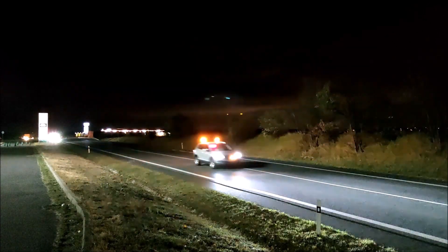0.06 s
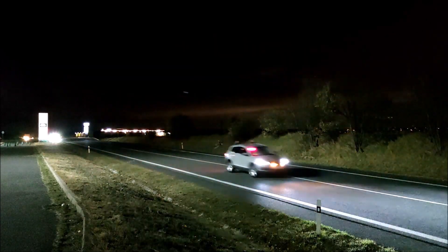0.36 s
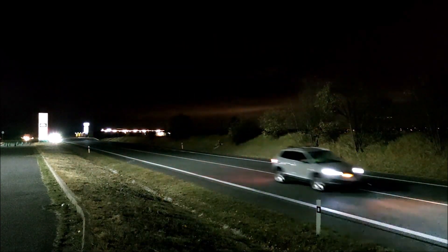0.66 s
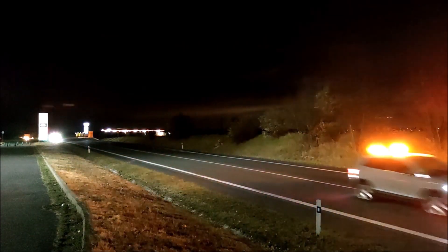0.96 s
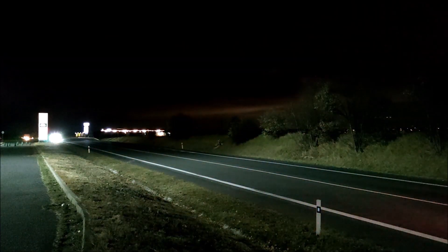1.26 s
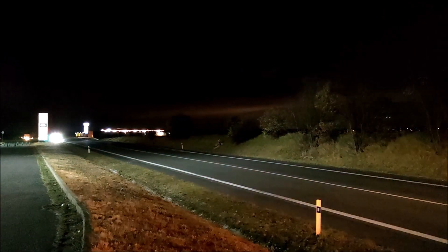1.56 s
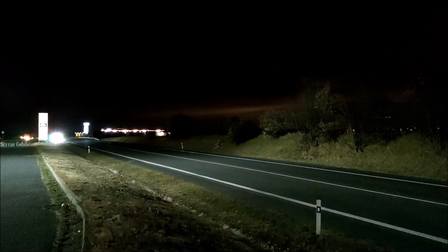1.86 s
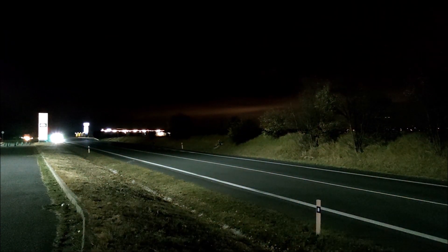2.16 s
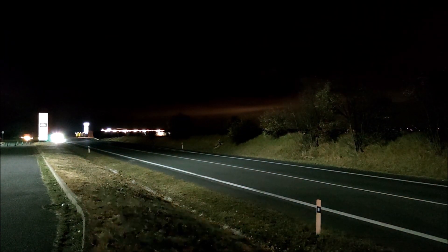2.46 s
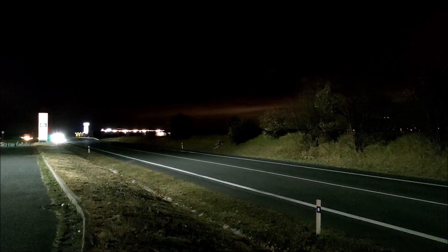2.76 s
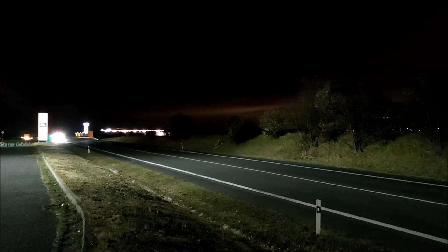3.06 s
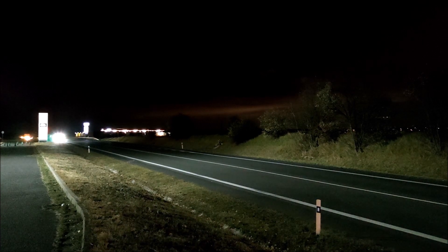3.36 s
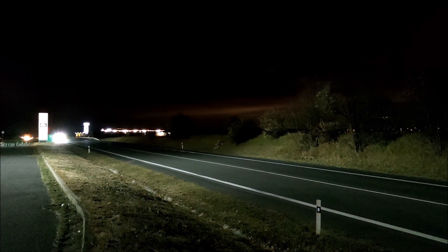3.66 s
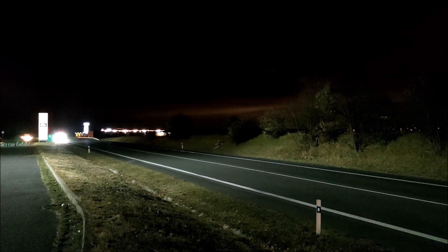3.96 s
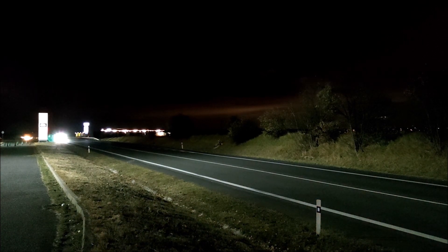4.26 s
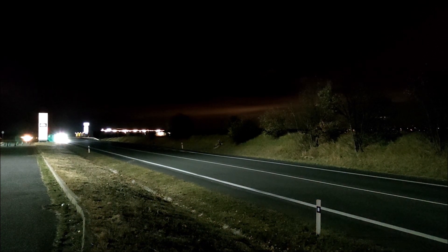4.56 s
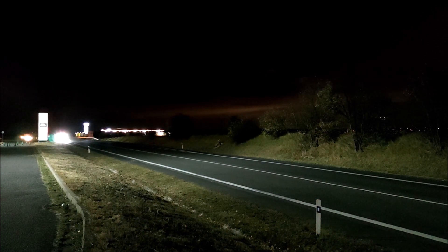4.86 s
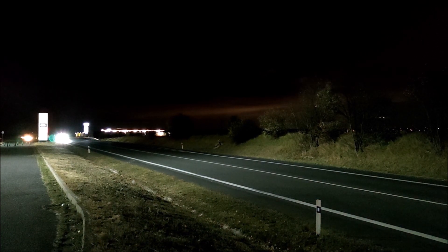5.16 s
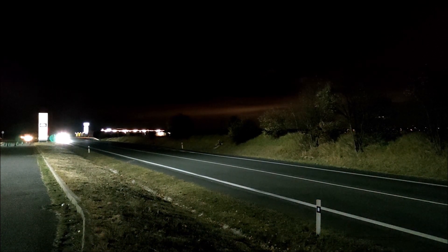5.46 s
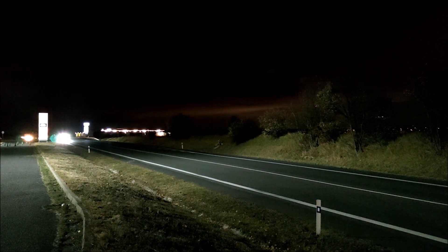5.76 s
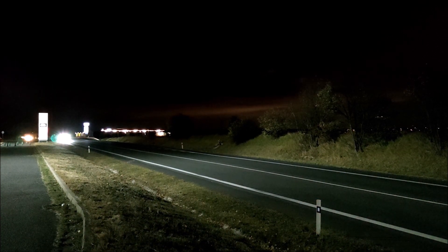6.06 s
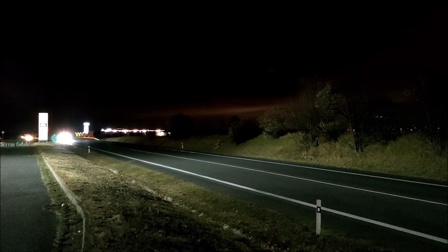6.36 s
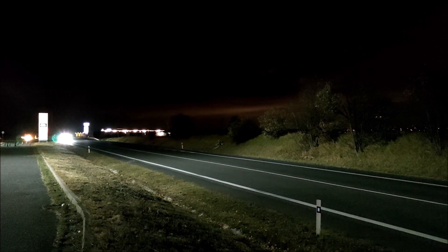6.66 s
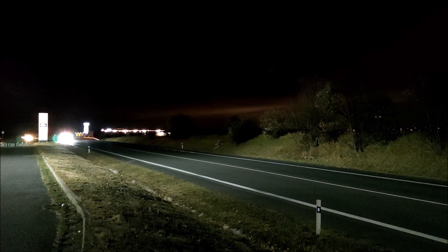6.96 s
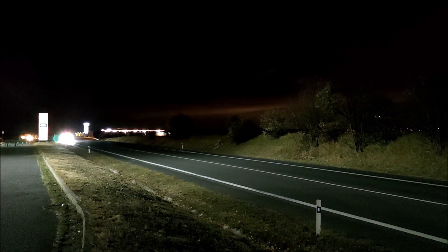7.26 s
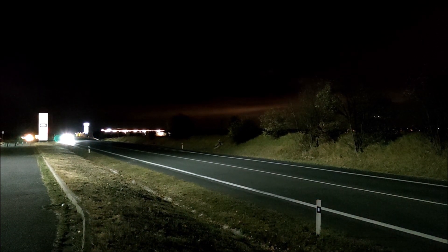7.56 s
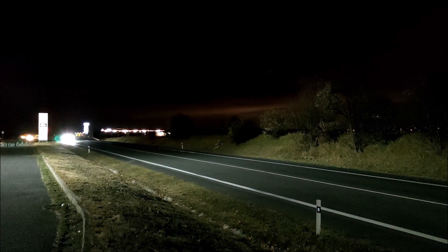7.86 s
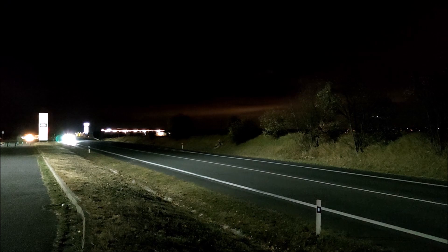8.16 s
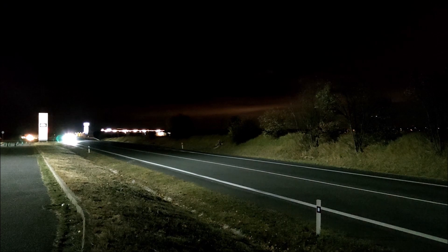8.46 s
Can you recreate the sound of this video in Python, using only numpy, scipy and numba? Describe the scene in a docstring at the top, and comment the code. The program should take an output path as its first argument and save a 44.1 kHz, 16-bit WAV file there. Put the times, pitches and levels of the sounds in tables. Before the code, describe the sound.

A car approaches at a steady speed on a country road at night, heard from a phone at the roadside. Its tyres roar and hiss over a soft engine hum, passing closest on the right at about 1.8 seconds with a slight drop in pitch. It then rolls away behind the microphone, leaving a distant tyre roar that lingers until about 8 seconds.

Light wind touches the microphone from the start. From about 2.5 seconds, strong gusts become the loudest sound, with low, uneven rumbling and sharp pops that jump between left and right. They are heaviest until about 5.5 seconds, then turn patchier, ease around 7.5 and swell again near 8. A few very faint dry rustles come close by from 4 seconds onward. Far traffic murmurs quietly underneath, and at about 8.4 seconds something taps lightly on the phone.

```python
"""A country road at night, heard by a phone with two microphone openings (ports), left and right.
A car passes at a steady speed and rolls away behind the phone. Its engine hums, its tyres roar and hiss
and pump air from their grooves, and the sound reaches one port before the other. Then gusts of wind
buffet each port separately and stir a few dry rustles nearby. Far traffic murmurs underneath,
and at the end something taps lightly on the phone."""
import sys
import numpy as np
from scipy import signal
from scipy.fft import rfft, irfft, next_fast_len
from scipy.io import wavfile
from scipy.ndimage import uniform_filter1d, minimum_filter1d, map_coordinates
from numba import njit

SR = 44100
rng = np.random.default_rng(int(sys.argv[2]) if len(sys.argv) > 2 else 0)


def output_pcm(signal):
    """Save a mono or channel-first signal as 16-bit PCM at the path in sys.argv[1].

    Samples are clipped to [-1, 1] before scaling.
    """
    pcm = np.clip(np.atleast_2d(signal).T, -1, 1) * 32767
    wavfile.write(sys.argv[1], SR, np.round(pcm).astype(np.int16))


N = 375291
TIME = np.arange(N) / SR
CLOSEST_S, PASSING_S = 1.755, .57  # when the car is closest; time it takes to drive that closest distance
ALONG = (TIME - CLOSEST_S) / PASSING_S  # its place on the road, counted in closest distances
NEAR = 1 / (1 + ALONG ** 2)  # 1 when closest, towards 0 far away
PAST = .5 + .5 * ALONG * np.sqrt(NEAR)  # goes from 0 (coming) to 1 (leaving)

# The tone colour of each noise. Each row: frequency in Hz, relative level in dB.
NIGHT_COLOUR = [(100, -13.5), (450, 2.5), (780, -10.5), (1100, -2.5), (2000, -9), (4000, -28.5),
                (7700, -25.5), (8800, -35), (14300, -33.5)]
RUSTLE_COLOUR = [(1200, -19), (2800, 1), (3400, -1), (4000, 3), (5000, -0.5), (7500, -4), (9000, -13),
                 (14000, -21.5)]
LEFT_WIND_COLOUR = [(8, -15), (20, 4.5), (60, 3), (130, -0.5), (250, -4), (450, -4), (800, -5.5),
                    (1500, -1.5), (4000, -23.5)]
RIGHT_WIND_COLOUR = [(14, -17.5), (30, -8.5), (60, 2.5), (130, 2), (250, 1.5), (450, 1.5), (800, 0),
                     (1500, -4), (4000, -7.5)]
TREAD_COLOUR = [(150, -15.5), (400, -16.5), (600, -6), (800, -1.5), (1000, -1.5), (1400, -8), (2000, -17.5),
                (4000, -51)]
SIDEWALL_COLOUR = [(100, -4.5), (250, -3.5), (400, -6.5), (600, -2), (780, -3.5), (1000, -26),
                   (1600, -44.5)]
HISS_COLOUR = [(250, -0.5), (500, -2.5), (1200, 13), (2500, 6.5), (4000, 3), (5500, -0.5), (7700, 1),
               (8700, -13), (10200, -14), (11500, -21), (14300, -19)]
GROOVES_COMING = [(900, -24.5), (1300, 0), (1650, 5), (2150, 2), (2550, -0.5), (3050, -4), (3500, -10),
                  (4200, -14.5), (6000, -18.5), (7700, -34.5), (9000, -54)]
GROOVES_LEAVING = [(900, -22), (1400, 5.5), (1800, 10), (2400, 2), (2950, 0.5), (3500, -6), (4200, -11),
                   (6000, -21), (7700, -42), (9000, -54)]
# Spells of far tyre whine. Each row: middle in seconds, half length in seconds, level in dB.
WHINE_SPELLS = [(5.68, .08, -70), (6.2, .12, -67), (6.72, 0.12, -75)]
# Dry rustles. Each row: middle in seconds, half length in seconds, level in dB, left minus right in dB.
DRY_RUSTLES = [(4.105, 0.026, -54.5, -6), (4.503, 0.013, -53, -3), (4.582, .03, -59, -5),
               (5.754, 0.025, -58, -4), (5.95, 0.014, -68, -5), (6.851, .012, -62, 4),
               (7.094, .06, -64, -3), (8.37, 0.018, -58, -7), (8.427, 0.022, -64, -6)]
# Taps on the phone. Each row: time in seconds, strength in dB.
PHONE_TAPS = [(8.355, -55), (8.399, -45), (8.424, -52)]
# Ringing notes of its case. Each row: pitch in Hz, width in Hz, level in dB, gain at the right port.
CASE_NOTES = [(3400, 200, 0, -.7), (3930, 300, -5.5, 1)]
# The breeze between gusts. Each row: time in seconds, left level in dB, right level in dB.
BREEZE_LEVELS = [(0.0, -38, -42.5), (1.7, -34, -36.5), (2.45, -30.5, -34.5), (3.1, -22.5, -25.5),
                 (4.05, -26, -36.5), (4.7, -25.5, -27.5), (5.3, -24.5, -45), (6.05, -34, -43),
                 (6.75, -30, -49), (7.55, -43, -41), (8.5, -31, -26)]
# Gusts. Each row: time of full strength in seconds, hold in seconds, left level in dB, right level in dB.
WIND_GUSTS = [(0.87, 0.038, -29, -27), (1.276, 0.073, -31.5, -54.0), (1.619, 0.042, -27, -37),
              (1.871, 0.069, -28.0, -25.5), (2.046, 0.012, -26, -25), (2.562, 0.035, -49.0, -19),
              (2.632, .008, -27, -12), (2.65, 0.061, -16.5, -36), (2.713, .006, -31, -21),
              (2.78, 0.1, -16, -13.5), (2.849, 0.14, -15.5, -20), (3.026, 0.043, -15, -24),
              (3.083, 0.11, -15, -31), (3.21, 0.097, -21, -22), (3.319, 0.074, -21.5, -29),
              (3.497, 0.052, -25, -24.5), (3.705, 0.082, -14.5, -16.5), (3.792, 0.056, -24.5, -12),
              (3.868, 0.024, -21.5, -23.5), (4.161, 0.04, -16.5, -48.5), (4.228, 0.074, -11.5, -16),
              (4.325, 0.1, -24, -22), (4.514, 0.059, -43, -19), (4.6, 0.12, -22, -23),
              (4.755, 0.015, -15.5, -11.5), (4.848, 0.049, -17.5, -25), (4.932, 0.014, -24, -14.5),
              (4.997, 0.014, -16.5, -17.5), (5.066, 0.027, -22, -14.5), (5.109, 0.081, -15, -15.5),
              (5.249, 0.013, -26, -13.5), (5.272, 0.023, -13.5, -25), (5.363, 0.015, -39, -24),
              (5.443, 0.013, -19, -18), (5.481, 0.073, -23, -27), (5.626, 0.0066, -39, -21.5),
              (5.68, 0.054, -25.5, -19.5), (5.793, 0.02, -40, -24.5), (5.881, 0.029, -41, -28),
              (5.955, 0.0036, -21, -29), (6.14, 0.04, -25, -47), (6.305, 0.032, -24, -51),
              (6.388, 0.059, -16.5, -33), (6.481, 0.031, -27, -17.5), (6.583, 0.05, -24.5, -31.5),
              (6.7, 0.016, -28, -24), (6.85, 0.085, -31.5, -24.5), (6.945, 0.027, -25.5, -32),
              (7.017, 0.0042, -33, -26.5), (7.189, 0.0066, -21, -60.0), (7.37, 0.04, -38, -64),
              (7.703, 0.028, -44, -25), (7.791, 0.14, -49.5, -21.5), (7.972, 0.09, -30, -28.5),
              (8.146, 0.067, -20.5, -31), (8.241, 0.081, -17, -35), (8.307, 0.065, -19.5, -19.5)]
# Hard eddies (small whirls of air).
# Each row: time in seconds, port (0 left, 1 right), peak in dB, half length in seconds.
HARD_EDDIES = [(1.925, 1, -9, 0.0031), (2.549, 1, -5, 0.00075), (2.645, 0, 1, 0.0009),
               (2.793, 1, 1, 0.00085), (2.834, 1, -1, 0.0011), (2.855, 1, -2.5, 0.0007),
               (2.974, 1, -5, 0.0011), (3.037, 0, -8, .001), (3.056, 1, -5, 0.00081),
               (3.099, 0, -9, 0.0015), (3.382, 1, -6, 0.001), (3.794, 1, -6, 0.00082),
               (4.025, 0, -14.5, .0016), (4.163, 0, -14, .0016), (4.19, 0, -12.5, 0.00044),
               (4.256, 0, -2, 0.00061), (4.555, 1, -19, 0.00053), (4.565, 1, -12.5, 0.00068),
               (4.646, 1, -14, 0.0008), (4.764, 1, 6.5, 0.00096), (4.775, 1, 0.5, 0.00076),
               (4.79, 1, -3, 0.00077), (4.867, 0, -11, 0.001), (4.934, 1, -5, 0.0028),
               (4.987, 1, -13, 0.00082), (5.062, 1, -3, 0.0024), (5.125, 1, -2.5, 0.00066),
               (5.26, 1, -4, 0.00081), (5.287, 0, -3, 0.0027), (5.292, 0, -4.5, 0.00047),
               (5.449, 1, -4.5, 0.0013), (6.317, 0, -10.5, 0.002), (6.352, 0, -12, 0.0022),
               (6.383, 0, -9.5, 0.00069), (6.437, 0, -7, 0.0012), (6.503, 1, -9.5, 0.00084),
               (6.725, 0, -9.5, 0.0012), (6.964, 0, -14, 0.0027), (7.128, 0, -18, 0.0018),
               (7.189, 0, -14, 0.0015), (7.836, 1, -12, 0.00078), (7.935, 1, -9.5, .0011)]
# Swells and dips of the tyre noise.
# Each row: middle in seconds, half length in seconds, then the change in dB of roar, grooves and hiss.
TYRE_SWELLS = [(0.297, 0.053, 2, 2.5, -3), (0.435, 0.09, 2.5, 4, 2.5), (0.798, 0.11, -0.2, 0.8, 3.5),
               (1.18, 0.11, 0.4, -0.5, 0.5), (1.43, 0.25, 1, 1, 0.5), (2.03, 0.056, 1, 2.5, 0),
               (2.853, 0.1, -0.5, 3.5, -0.5), (3.52, 0.085, 3.5, 2, 2.5), (3.98, 0.039, 1, -16, 0.5),
               (4.4, 0.047, -1, 9, -2.5), (4.44, 0.2, 5.5, 3, 4), (5.012, 0.055, -1, -8, -0.5),
               (6.15, 0.44, 3, 3, 0), (6.698, 0.1, -1.5, -1, -2), (7.1, 0.16, 5.5, -1, 1),
               (7.597, 0.31, 4.5, -8, 1.5)]
# The wandering pitch of the far roar. Each row: time in seconds, pitch in Hz.
FAR_ROAR_PITCH = [(.4, 1171), (1.3, 1058), (4.3, 1141), (6.35, 1060), (6.95, 1259), (7.7, 1299)]
# Bands of the far roar that come and go. Each row: middle pitch in Hz, relative level in dB.
FAR_ROAR_BANDS = [(860, -6.5), (1060, -3.5), (1270, -5.5), (1520, -9.5)]
# Sound bending round the phone colours the left port as the car moves.
# Each row: time in seconds, treble lift in dB, pitch of a peak or dip in Hz, its height in dB.
LEFT_PORT_TONE = [(.2, -0.5, 2700, 2.5), (.8, -2, 2480, 5.5), (1.25, 2, 2050, 4), (1.8, 1.5, 2900, -1.5),
                  (2.2, 1, 3300, 5.5), (2.52, 0.5, 3630, 6), (2.67, -0.5, 3750, 3), (2.85, 0, 3730, 1),
                  (3.7, 1, 3400, 4), (4.4, 0.5, 3400, -4.5), (8.5, -0.5, 3400, 5)]
# At the right port a bright spot slides down as the car draws level.
# Each row: time in seconds, pitch of the spot in Hz, its height in dB.
RIGHT_PORT_TONE = [(1.05, 4870, -1), (1.36, 3700, 6), (1.55, 2500, -0.5), (1.8, 1904, 0)]


def undb(db):
    """Turn decibels into a gain."""
    return 10 ** (np.asarray(db) / 20)


def unit(x):
    """Scale a signal to an average (rms) level of 1."""
    return x / np.sqrt(np.mean(x ** 2))


def bell(middle_s, half_s):
    """A smooth rise to 1 and fall again."""
    return np.exp(-.5 * ((TIME - middle_s) / half_s) ** 2)


def curves(table):
    """Join the rows of a timed table with straight lines, one curve for each column after the time."""
    times, *columns = np.transpose(table)
    return [np.interp(TIME, times, column) for column in columns]


def noise(colour):
    """Noise of level 1 with the given tone colour, falling away beyond the ends of the table."""
    size = next_fast_len(N)
    freqs = np.arange(size // 2 + 1) * SR / size + 1
    hz, db = np.transpose(colour)
    gain = undb(np.interp(np.log(freqs), np.log(hz), db))
    gain = gain * np.minimum(freqs / hz[0], 1) * np.minimum(hz[-1] / freqs, 1) ** 2
    return unit(irfft(rfft(rng.standard_normal(size)) * gain, size)[:N])


def wobble(per_s):
    """A smooth random wobble of size 1 that heads for a new value per_s times a second."""
    hold = max(int(SR / per_s), 2)
    steps = np.repeat(rng.standard_normal(N // hold + 1), hold)
    return unit(uniform_filter1d(uniform_filter1d(steps, hold), hold)[:N])


@njit
def lowpass(x, hz, damping):
    """Keep what lies below a moving frequency; low damping makes the filter ring."""
    out, band_state, low_state = np.empty(len(x)), 0., 0.
    for i in range(len(x)):
        step = np.tan(np.pi * hz[i] / SR)
        band = (band_state + step * (x[i] - low_state)) / (1 + step * (step + damping))
        out[i] = low_state + step * band
        band_state, low_state = 2 * band - band_state, 2 * out[i] - low_state
    return out


def bandpass(x, hz, width_hz):
    """Keep a band around a pitch that may move."""
    hz = np.clip(hz, 50, .4 * SR) + np.zeros(N)
    damping = float(width_hz / hz.mean())
    return np.gradient(lowpass(x, hz, damping)) * damping * SR / (2 * np.pi * hz)


def car_bearing(late_s=0., closest_deg=69.5, bend_deg_per_s=1.05):
    """The car's direction on a gently bending road, in radians: 0 is ahead of the phone, pi behind."""
    since_s = TIME - late_s - CLOSEST_S
    return np.radians(closest_deg - bend_deg_per_s * since_s) + np.arctan(since_s / PASSING_S)


def at_ports(x, bearing, detour=0., side_lag_s=.00052):
    """Sound from the side reaches the right port later; a detour round the phone adds to the delay."""
    lag_s = side_lag_s * np.sin(bearing) * (1 + detour * np.maximum(np.cos(bearing), 0) ** 2)
    return np.array([x, map_coordinates(x, [np.arange(N) - lag_s * SR], order=3, mode="nearest")])


def night_air(level_db=-53):
    """Far traffic and night air, from no one direction."""
    return np.array([noise(NIGHT_COLOUR) * undb(level_db + 1.1 * wobble(3.8)) for _ in range(2)])


def far_whine(hz=2935, width_hz=70, waver_db=3.5):
    """Far down the road the tyres sing faintly on one note that comes and goes."""
    swell = sum(undb(db) * bell(s, half_s) for s, half_s, db in WHINE_SPELLS)
    note = unit(bandpass(rng.standard_normal(N), hz * (1 + .008 * wobble(5)), width_hz))
    return at_ports(note * swell * undb(waver_db * wobble(12)), car_bearing())


def rustles(grain_db=4.5, grains_per_s=450):
    """Short, grainy brushes of something dry close by."""
    sides = np.array([[.5], [-.5]])
    swell = sum(undb(db + sides * pan_db) * bell(s, half_s) for s, half_s, db, pan_db in DRY_RUSTLES)
    grain = undb(grain_db * wobble(grains_per_s))
    return swell * np.array([unit(noise(RUSTLE_COLOUR) * grain) for _ in range(2)])


def taps(attack_s=.0008, decay_s=.0041, scratch_db=-7):
    """Each tap is a short scratch that rings the phone's case, driving the ports in or out of step."""
    push = np.zeros(N)
    for s, db in PHONE_TAPS:
        rise = np.clip(1 + (TIME - s) / attack_s, 0, 1)
        push += undb(db) * rise * np.exp(-np.maximum(TIME - s, 0) / decay_s)
    out = np.array([noise(RUSTLE_COLOUR) for _ in range(2)]) * push * undb(scratch_db)
    for hz, width_hz, db, right_gain in CASE_NOTES:
        ring = bandpass(rng.standard_normal(N) * push, hz, width_hz) * np.sqrt(SR / (np.pi * width_hz))
        out += np.array([[1], [right_gain]]) * ring * undb(db)
    return out


def eddies():
    """A hard eddy crosses one port: a spike of pressure between two shallow troughs."""
    out = np.zeros((2, N))
    for s, port, db, half_s in HARD_EDDIES:
        offset = (TIME - s) / half_s
        spike = (1 - offset ** 2) / (1 + offset ** 2 / 2) ** 3
        out[round(port)] += undb(db) * rng.choice([-1, 1]) * spike
    return out


def wind_strength(port, attack_s=.036, release_s=.024, wake_db=-12, wake_s=.0048, waver_db=2.0):
    """Wind level in dB on one port: breeze, gusts and the wake of rough air that each eddy drags."""
    power = undb(curves(BREEZE_LEVELS)[port]) ** 2
    for s, hold_s, *port_db in WIND_GUSTS:
        rise = np.clip(1 + (TIME - s) / attack_s, 0, 1)
        fall = np.exp(-np.clip((TIME - s - hold_s) / release_s, 0, 20))
        power += (undb(port_db[port]) * rise * fall) ** 2
    for s, eddy_port, db, _ in HARD_EDDIES:
        if round(eddy_port) == port:
            wake = np.exp(-np.minimum(np.abs(TIME - s) / wake_s, 20))
            power += (undb(db + wake_db) * wake) ** 2
    return 10 * np.log10(power) + waver_db * wobble(40)


def wind(gust_db, colour, corner_hz, trim_db, db_per_octave=23, patchy_db=3.0, bass_hz=58):
    """Churning air on one port: faster air carries smaller eddies, so it is brighter as well as louder."""
    patch_db = patchy_db * wobble(150)
    octaves_up = (gust_db + .93 * patch_db + 19) / db_per_octave
    hz = np.clip(corner_hz * 2 ** octaves_up, 120, 680)
    pressure = lowpass(lowpass(noise(colour), hz, 1.204), 2.1 * hz, 1.89) * undb(patch_db)
    # the deepest rumble thins out as the air speeds up
    rumble_hz = np.clip(bass_hz * undb(gust_db + 17), 2, 120)
    pressure -= lowpass(pressure, rumble_hz, 2.9)
    # even out the level, so that the gust sets the loudness
    power = uniform_filter1d(pressure ** 2, int(.04 * SR))
    return pressure / np.sqrt(power + 1e-9) * undb(gust_db + trim_db)


def engine(firing_hz=61.6, doppler=.023, roughness=.19):
    """A soft firing hum whose pitch sinks as the car goes by."""
    hz = firing_hz * (1 - doppler * ALONG * np.sqrt(NEAR) + .0064 * wobble(10))
    phase = 2 * np.pi * np.cumsum(hz) / SR
    return unit(np.sin(phase) + .66 * np.sin(2 * phase)) * (1 + roughness * wobble(22))


def tyre_levels(fade_s=7.84, fade_db_per_s=12):
    """Roar, groove and hiss levels in dB. The wedge between tyre and road beams them front and back."""
    def drive_by(closest_db, front_lift_db, rear_lift_db):
        """The level falls with distance, but gains a lift when the car is seen end on."""
        lift_db = (1 - NEAR) * np.where(ALONG < 0, front_lift_db, rear_lift_db)
        return closest_db + 10 * np.log10(NEAR) + lift_db

    roar_db = drive_by(-36, 8.5, 2.5) - fade_db_per_s * np.maximum(TIME - fade_s, 0)
    groove_db = drive_by(-44.5, 12, 5.5) + .05 * np.abs(TIME - CLOSEST_S)
    hiss_db = drive_by(-44, 3, 2)
    swells_db = sum(np.outer(change_db, bell(s, half_s)) for s, half_s, *change_db in TYRE_SWELLS)
    return np.array([roar_db, groove_db, hiss_db]) + swells_db


def grooves(level_db, axle_bearings, flutter_db=1.7):
    """The tyres on each axle pump air out of their grooves; the tone changes as the car passes."""
    out = np.zeros((2, N))
    for axle in axle_bearings:
        pumping = noise(GROOVES_COMING) * np.sqrt(1 - PAST) + noise(GROOVES_LEAVING) * np.sqrt(PAST)
        out += at_ports(pumping * undb(level_db + flutter_db * wobble(24)), axle) / np.sqrt(2)
    return out


def road_hiss(level_db, bearing, axle_bearings, facing_db=3, flutter_db=1.97):
    """Part of the tyre hiss comes straight from each axle; the rest scatters off road and verge."""
    # more comes straight to the phone while the car is near or in front of it
    direct_share = .42 * NEAR ** .25 + .54 * np.maximum(np.cos(bearing), 0) ** 8
    scattered = np.array([noise(HISS_COLOUR) * undb(flutter_db * wobble(30)) for _ in range(2)])
    hiss = scattered * np.sqrt(1 - direct_share)
    for axle in axle_bearings:
        direct = noise(HISS_COLOUR) * undb(flutter_db * wobble(24))
        hiss += at_ports(direct * np.sqrt(direct_share / 2), axle)
    return hiss * undb(level_db + facing_db * NEAR * (np.cos(bearing) - .5))


def round_the_phone(groove_air, hiss, bearing, open_hz=.4 * SR, shaded_hz=7500):
    """The phone shades the right port from the treble, and sound bending round it colours both ports."""
    shade = np.exp(-((np.degrees(bearing) - 74) / 32) ** 2)  # deepest at 74 degrees
    cutoff_hz = open_hz * (shaded_hz / open_hz) ** shade
    right = groove_air[1] + lowpass(hiss[1], cutoff_hz, 2.3) * undb(-1.3 * shade)
    spot_hz, spot_db = curves(RIGHT_PORT_TONE)
    right += (undb(spot_db) - 1) * bandpass(right, spot_hz, width_hz=900)
    lift_db, peak_hz, peak_db = curves(LEFT_PORT_TONE)
    left = (groove_air[0] + hiss[0]) * undb(lift_db)
    left += (undb(peak_db) - 1) * bandpass(left, peak_hz, width_hz=610)
    return np.array([left, right])


def far_roar(pitch_ratio, width_hz=190, flutter_db=3.0, drift=.03):
    """Over a long path the moving air lets now one part of the roar through, now another."""
    out = np.zeros(N)
    for hz, db in FAR_ROAR_BANDS:
        band = bandpass(noise(TREAD_COLOUR), hz * pitch_ratio * (1 + drift * wobble(2.6)), width_hz)
        out += unit(band) * undb(db + flutter_db * wobble(9))
    return out


def tread_roar(level_db, closest_hz=821, far_db=-1, flutter_db=.63):
    """The tread roars on the road; the wedge under the tyre beams a higher roar front and back."""
    far_hz, = curves(FAR_ROAR_PITCH)
    pitch_hz = far_hz + (closest_hz - far_hz) * NEAR
    read_at = np.cumsum(pitch_hz / 1000)  # moves 1000 Hz in the noise to pitch_hz
    tread = map_coordinates(noise(TREAD_COLOUR), [read_at], order=3, mode="mirror")
    far = (1 - NEAR) ** 4
    roar = tread * np.sqrt(1 - far / 2) + far_roar(far_hz / far_hz.mean()) * far * undb(far_db)
    return roar * undb(level_db + flutter_db * wobble(17))


def car(axle_delays_s=(.01, .06), low_turn_deg=-3.5):
    """The engine and two axles sweep past; the tyre walls drone sideways, most when the car is close."""
    roar_db, groove_db, hiss_db = tyre_levels()
    bearing = car_bearing()
    axle_bearings = [car_bearing(late_s) for late_s in axle_delays_s]
    roar = tread_roar(roar_db)
    drone = noise(SIDEWALL_COLOUR) * undb(roar_db - 12.5 + 7.4 * NEAR)
    hum = engine() * undb(roar_db - 15 + 7.8 * NEAR)
    hiss = road_hiss(hiss_db, bearing, axle_bearings)
    groove_air = grooves(groove_db, axle_bearings)
    # long waves bend round the phone, which turns their direction and lengthens their path
    low_bearing = bearing + np.radians(low_turn_deg) * (1 - PAST)
    lows = at_ports(roar + drone + hum, low_bearing, detour=.18)
    return lows + round_the_phone(groove_air, hiss, bearing)


def scene():
    """Add up the night air, the small sounds, the wind on each port and the car."""
    left_db, right_db = wind_strength(0), wind_strength(1)
    left = wind(left_db, LEFT_WIND_COLOUR, corner_hz=218.3, trim_db=.14)
    right = wind(right_db, RIGHT_WIND_COLOUR, corner_hz=234.6, trim_db=-.53)
    return night_air() + far_whine() + rustles() + taps() + eddies() + np.array([left, right]) + car()


def record(dry, ceiling=.98, hold_s=.0069, top_hz=14300):
    """The phone's limiter turns down the hardest buffets, and the highest treble is cut."""
    hold = int(hold_s * SR)
    allowed_gain = ceiling / np.maximum(np.abs(dry), ceiling)
    gain = uniform_filter1d(minimum_filter1d(allowed_gain, hold), hold)
    treble_cut = signal.ellip(10, .2, 80, top_hz, fs=SR, output="sos")
    return signal.sosfilt(treble_cut, dry * gain)


dry = scene()
out = record(dry)
output_pcm(out)
```